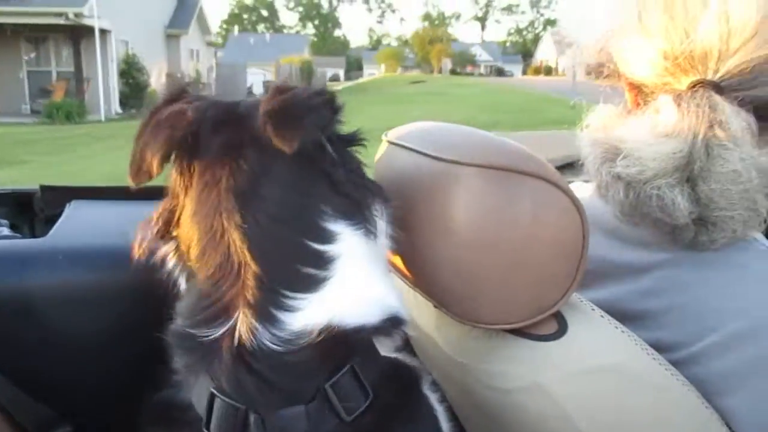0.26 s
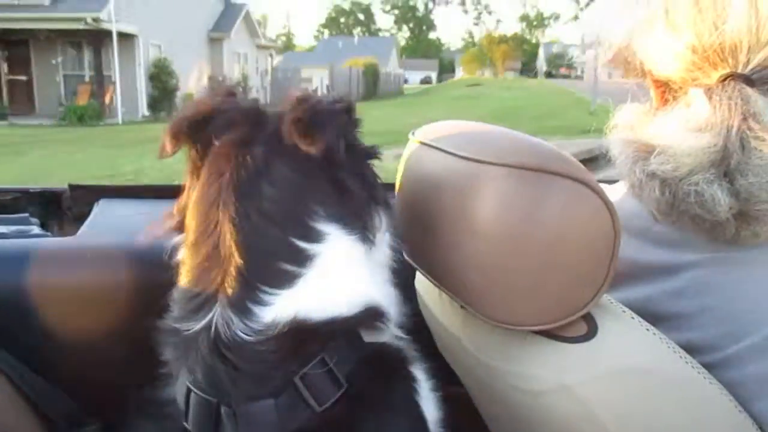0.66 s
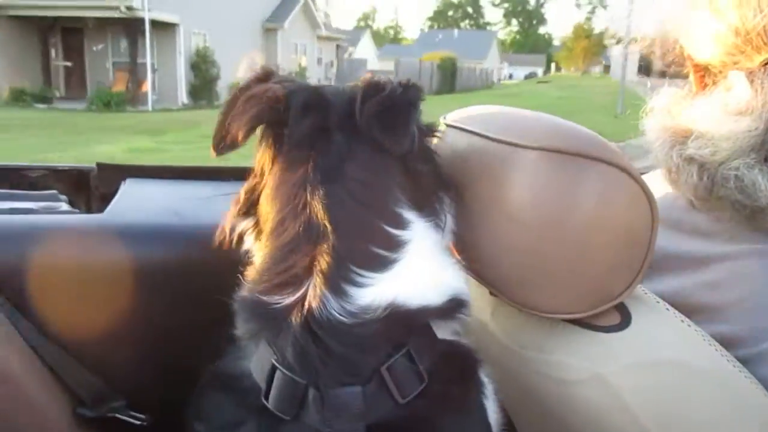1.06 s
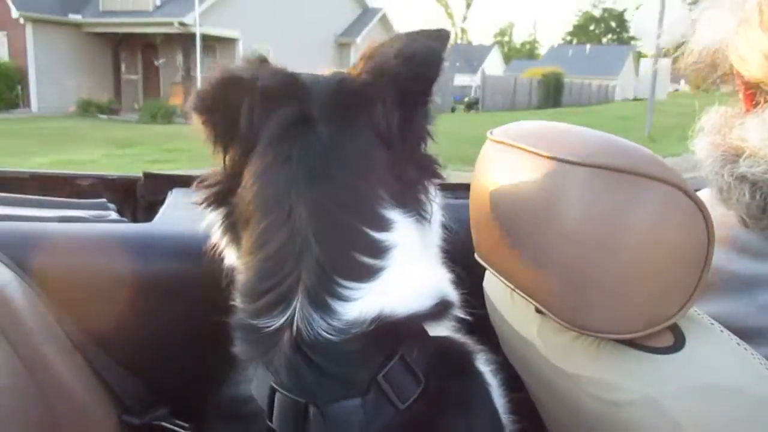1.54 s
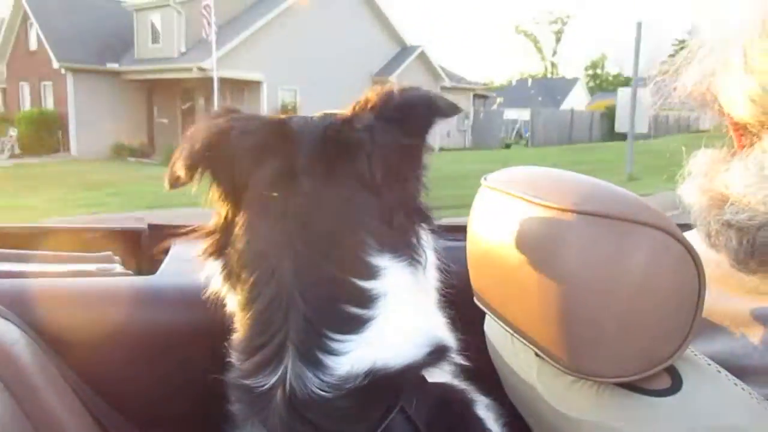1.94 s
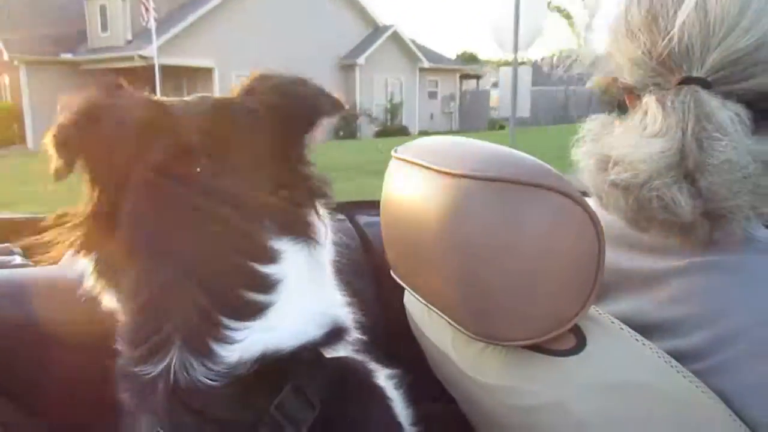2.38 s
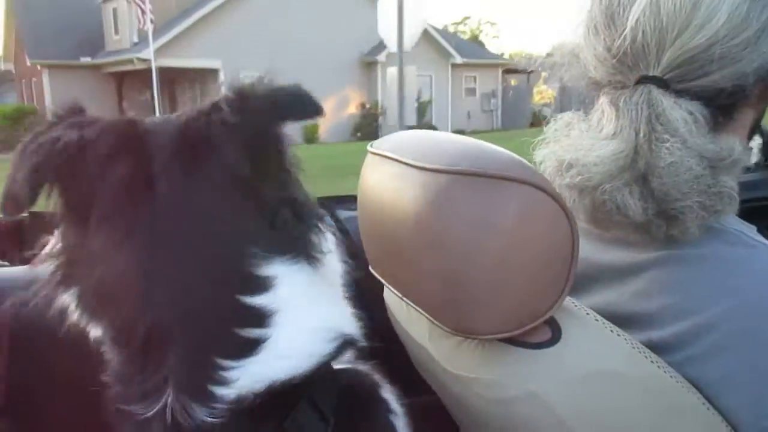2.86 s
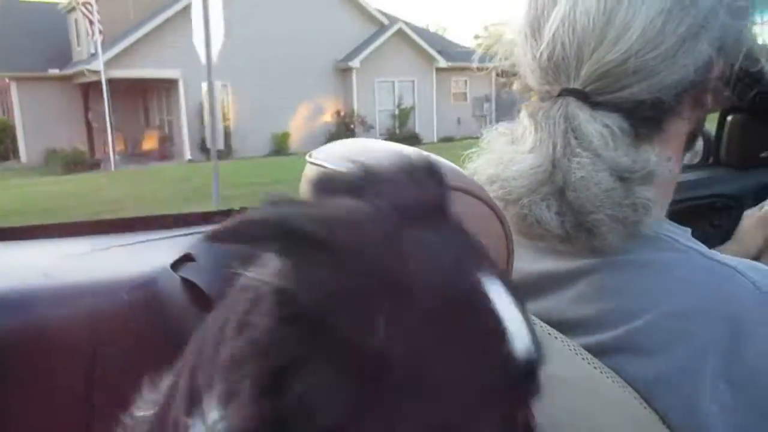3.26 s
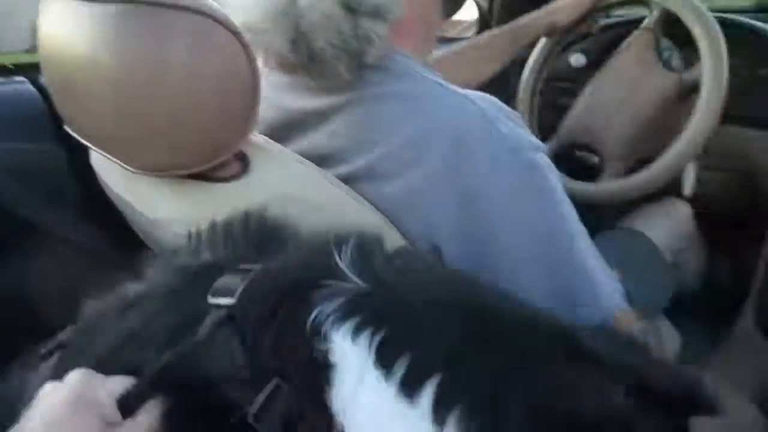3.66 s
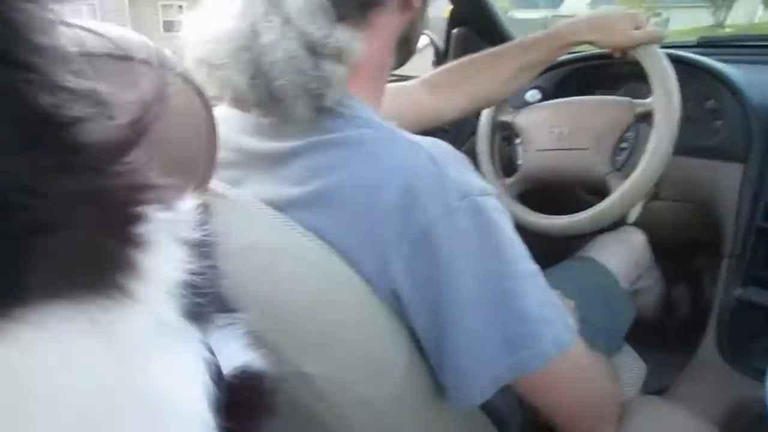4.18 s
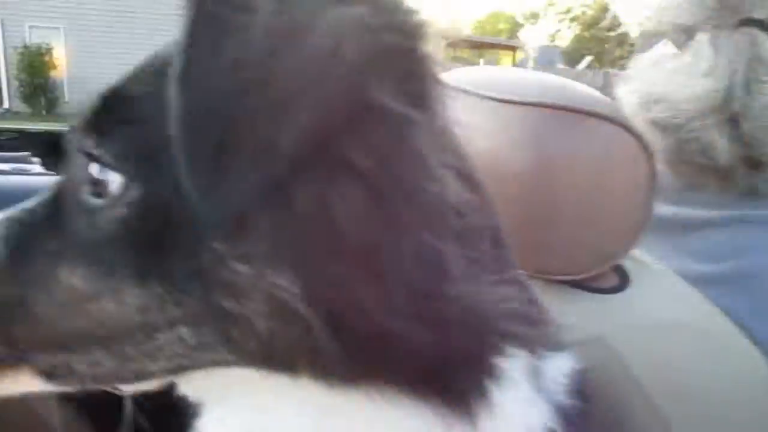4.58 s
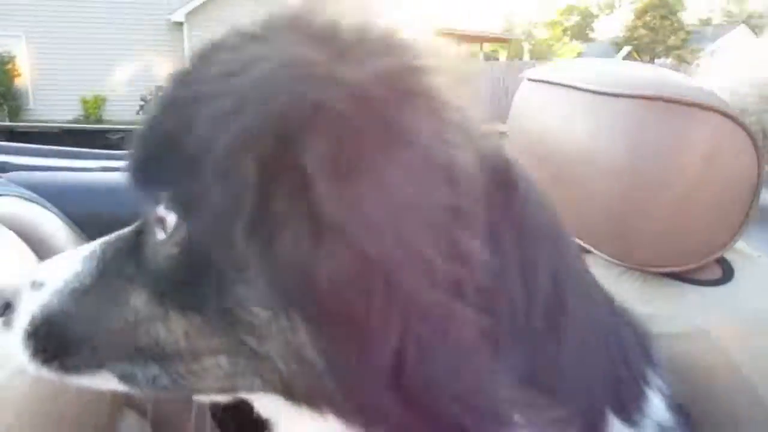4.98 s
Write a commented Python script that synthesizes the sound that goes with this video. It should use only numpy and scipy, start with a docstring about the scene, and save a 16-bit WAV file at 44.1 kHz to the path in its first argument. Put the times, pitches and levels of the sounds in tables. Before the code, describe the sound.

Low engine burble swells into a booming drone in an open-top car while wind pops grow violent and a dog's collar tags clink.

```python
"""Open car pulling away

An open car with an eight-cylinder engine pulls away down a quiet street; the microphone rides in the back.
The exhaust booms and throbs as tones on the engine cycle, with pulsed noise for growl and hiss.
Gusts rumble and flutter as dull noise and pop as short pulses on the microphone. A dog huffs (noise through
resonances), its collar tags clink (ringing modes and ticks) and a far bird chirps (gliding sines)."""
import sys
import numpy as np
from scipy import signal
from scipy.fft import rfft, irfft, next_fast_len
from scipy.io import wavfile

SR = 44100
rng = np.random.default_rng(int(sys.argv[2]) if len(sys.argv) > 2 else 0)


def convert_level_to_amplitude(level_db):
    """Map a level in decibels to its linear amplitude factor."""
    exponent = np.asarray(level_db, float) / 20
    return 10 ** exponent


def materialize(psi):
    """Save the field psi as 16-bit PCM at rate SR to the path in sys.argv[1].

    A 1-D psi becomes a single channel; in a 2-D psi each row is a channel.
    """
    bounded = np.clip(np.atleast_2d(psi).T, -1, 1)
    quanta = np.round(bounded * 32767).astype(np.int16)
    wavfile.write(sys.argv[1], SR, quanta)


N = 230241


def rms_one(x):
    """Scale to rms 1."""
    return x / np.sqrt(np.mean(x ** 2) + 1e-20)


def in_time(rows):
    """Each column of a table, after its time column, as a curve over all samples."""
    s, *columns = np.transpose(rows)
    return [np.interp(np.arange(N) / SR, s, c) for c in columns]


def drift(rate_hz):
    """Random wander of spread 1: noise through two equal low-pass poles at the given rate."""
    hop = 40   # samples between computed points
    r = np.exp(-2 * np.pi * rate_hz * hop / SR)
    settle = 2000
    noise = rng.standard_normal(N // hop + settle + 2)
    slow = signal.lfilter([1], [1, -2 * r, r * r], noise)[settle:]
    return np.interp(np.arange(N) / hop, np.arange(len(slow)), rms_one(slow - slow.mean()))


def coloured(spectrum):
    """Noise with the given spectrum, falling steeply past its last point; rms 1."""
    hz, level_db = np.transpose(spectrum)
    size = next_fast_len(N)
    grid = np.arange(size // 2 + 1) * SR / size + 1
    shape = convert_level_to_amplitude(np.interp(np.log(grid), np.log(hz), level_db, left=-90))
    shape *= np.minimum(1, hz[-1] / grid) ** 4
    return rms_one(irfft(rfft(rng.standard_normal(size)) * shape, size)[:N])


# whistles of a far bird: (start [s], length [s], from [Hz], to [Hz], peak level [dB])
BIRD_CHIRPS = [(1.205, 0.03, 3300, 2940, -61), (1.418, 0.058, 2920, 3160, -63)]


def bird():
    """Short gliding whistles: sines under a smooth rise and fall."""
    out = np.zeros(N)
    for s, length, from_hz, to_hz, level_db in BIRD_CHIRPS:
        size, at = round(length * SR), round(s * SR)
        turns = np.cumsum(np.linspace(from_hz, to_hz, size)) / SR
        out[at:at + size] += convert_level_to_amplitude(level_db) * np.hanning(size) * np.sin(2 * np.pi * turns)
    return out


# resonances of the dog's snout: (centre [Hz], width [Hz], relative level [dB])
SNOUT_RESONANCES = [(2560, 330, 2), (4580, 600, 0), (5940, 480, 1), (7400, 400, -5.5), (11000, 600, -17.5)]
# breaths of the dog: (start of hold [s], length of hold [s], rms level [dB], fade after it [dB/s])
DOG_HUFFS = [(-.03, .23, -57.5, 148.5), (0.388, 0.076, -66.5, 498)]


def huffs():
    """Breath noise through the resonances of the snout: quick rise, hold, fade."""
    attack_db_per_s = 600
    air, out, t = rng.standard_normal(N), np.zeros(N), np.arange(N) / SR
    for k, (hz, width_hz, level_db) in enumerate(SNOUT_RESONANCES):
        r = np.exp(-np.pi * width_hz / SR)
        poles = [1, -2 * r * np.cos(2 * np.pi * hz / SR), r * r]
        out += (-1) ** k * convert_level_to_amplitude(level_db) * signal.lfilter([1 - r * r, 0, r * r - 1], poles, air)
    breath = np.zeros(N)
    for s, length, level_db, fade in DOG_HUFFS:
        rise_db = attack_db_per_s * np.maximum(s - t, 0)
        fade_db = fade * np.maximum(t - s - length, 0)
        breath += convert_level_to_amplitude(level_db - rise_db - fade_db)
    return breath * rms_one(out)


# touches of the collar tags: (time [s], strength [dB], trim of the modes below 8 kHz [dB])
TAG_CLINKS = [(0.303, -50.5, -20), (0.425, -65, -1), (0.4569, -67, 0.5), (2.7472, -53.5, -6),
              (2.7702, -69, -0.5), (3.1546, -47, -23), (3.6018, -32, -6.5), (3.6634, -39, -7.5),
              (4.2271, -43, -12), (4.2846, -48, -25)]
# ringing modes of the tags, one column each: (pitch [Hz])
TAG_MODE_HZ = [6695, 6715, 11968, 14670, 11981, 6115]
# the same modes: (time to fall by 60 dB [s])
TAG_MODE_T60 = [.25, .25, .13, .13, .11, 0.076]
# the same modes: (relative level [dB])
TAG_MODE_DB = [-5, -2.5, -5, -23, -4.5, -6.5]


def tags():
    """Two metal tags touch: a noisy tick and decaying modes, some in close pairs that beat."""
    s, strength_db, lower_db = np.transpose(TAG_CLINKS)
    at, out = np.round(s * SR).astype(int), np.zeros(N)
    luck_db = rng.normal(0, 1.5, (len(at), len(TAG_MODE_HZ)))
    for k, (hz, level_db, t60) in enumerate(zip(TAG_MODE_HZ, TAG_MODE_DB, TAG_MODE_T60)):
        r, w = convert_level_to_amplitude(-60 / (t60 * SR)), 2 * np.pi * hz / SR
        clicks = np.zeros(N) + 1e-18
        trim_db = lower_db * (hz < 8000)
        # modes are struck with alternating signs
        clicks[at] = (-1) ** k * convert_level_to_amplitude(strength_db + level_db - 7 + trim_db + luck_db[:, k])
        out += signal.lfilter([0, np.sin(w)], [1, -2 * r * np.cos(w), r * r], clicks)
    ticks = np.zeros(N)
    ticks[at] = convert_level_to_amplitude(strength_db + 1)
    ticks = signal.lfilter([1], [1, -.985], ticks) * rng.standard_normal(N)
    tick_band = signal.butter(2, [6000, 12500], "band", fs=SR, output="sos")
    return out + signal.sosfilt(tick_band, ticks)


# colour of the wind's rumble: (frequency [Hz], relative density [dB])
RUMBLE_SPECTRUM = [(18, -34), (30, 9), (50, 20), (80, 20), (150, 16), (250, -46)]


def rumble(level_db):
    """Steady airflow presses on the microphone: deep noise with a wandering level."""
    return convert_level_to_amplitude(level_db + 1.3 * drift(6.5)) * coloured(RUMBLE_SPECTRUM)


# colour of the wind's flutter: (frequency [Hz], relative density [dB])
FLUTTER_SPECTRUM = [(60, -16.5), (120, 6), (250, 0.5), (450, -11), (800, -25), (1500, -45), (3000, -72)]
# gusts over the microphone port, also used by scattered_eddies:
# (time of peak [s], flutter level [dB], half length, to 1/e [s])
WIND_GUSTS = [(0.018, -28.5, .02), (0.114, -31, .015), (0.186, -30, 0.024), (0.343, -37, 0.024),
              (0.481, -31.5, 0.026), (0.613, -28, 0.034), (0.792, -33, .015), (0.925, -25.5, .04),
              (1.074, -31, .02), (1.343, -24.5, 0.019), (1.436, -21.5, 0.024), (1.509, -27, 0.0317),
              (1.592, -29.5, 0.024), (1.815, -24, 0.031), (1.937, -20.5, .035), (2.074, -24.5, 0.032),
              (2.53, -27, 0.057), (2.917, -26.5, 0.043), (3.323, -9.5, 0.022), (3.466, -19, .06),
              (3.801, -12, 0.048), (3.954, -15.5, 0.024), (4.034, -20, 0.025), (4.15, -20, 0.024),
              (4.271, -17.5, 0.03), (4.34, -13, .02), (4.431, -19, .02), (4.491, -20, 0.017),
              (4.605, -17, 0.029), (4.684, -17, .03), (4.888, -20, 0.023), (5.054, -21.5, 0.038),
              (5.11, -22.5, 0.034), (5.173, -18.5, 0.029)]


def flutter(steady_db):
    """Dull noise in quick lumps; each gust swells it in a bell shape."""
    t = np.arange(0, N / SR + .001, .001)
    bells = sum(convert_level_to_amplitude(db) * np.exp(-((t - s) / half_s) ** 2) for s, db, half_s in WIND_GUSTS)
    swell = convert_level_to_amplitude(steady_db) + np.interp(np.arange(N) / SR, t, bells)
    lumps_db = 6.65 * np.tanh(0.9 * drift(31))
    return swell * rms_one(coloured(FLUTTER_SPECTRUM) * convert_level_to_amplitude(lumps_db))


def scattered_eddies():
    """Every gust scatters four chance pops about its peak; stronger gusts tend to give brighter ones."""
    s, gust_db, half_s = np.repeat(WIND_GUSTS, 4, axis=0).T
    when, size, pitch = rng.standard_normal((len(s), 3)).T
    pop_s = np.clip(s + half_s * np.tanh(when), 0, (N - 1) / SR)
    peak_db = gust_db + 4.5 - 8 * np.abs(size)
    centre_hz = 500 * convert_level_to_amplitude(pitch + 0.17 * (gust_db + 22))   # 20 dB is a factor of ten in pitch
    return np.transpose([pop_s, peak_db, centre_hz])


def wind_pops(pops):
    """Each eddy is a short pressure pulse of chance shape, doubled by a weaker one some 4 ms away."""
    span = 2048   # samples in a pulse, and the margin at either end
    out = np.zeros(N + 2 * span)
    hz = np.fft.rfftfreq(span, 1 / SR) + 1
    luck = rng.standard_normal((len(pops), span // 2 + 3))
    for (s, peak_db, centre_hz), (turn, spacing, *wander) in zip(pops, luck):
        centre_hz = centre_hz * convert_level_to_amplitude(0.5 * max(peak_db + 3.5, 0))   # the hardest pops crack brighter
        ratio = hz / (0.91 * centre_hz)
        fall = 4.35 * (550 / centre_hz) ** .5   # high pops fall off more gently into the treble
        phase = np.pi * turn + np.log(ratio) + 0.24 * np.cumsum(wander)
        shape = ratio ** 0.57 / (1 + ratio ** fall) / (1 + (ratio / 4.63) ** 3.7)
        pair = 1 + 0.59 * np.exp(-2j * np.pi * hz * (0.003934 + 0.0018 * spacing))
        pulse = np.fft.fftshift(irfft(shape * pair * np.exp(1j * phase))) * np.hanning(span) ** 2
        at = span + round(s * SR) - span // 2
        out[at:at + span] += convert_level_to_amplitude(peak_db) * pulse / np.abs(pulse).max()
    return out[span:span + N]


# pops of the wind on the microphone port, faint to very loud, timed one by one:
# (time [s], peak level [dB], nominal centre [Hz])
TIMED_POPS = [(0.011, -18.5, 465), (0.167, -24.5, 566), (0.191, -20, 446), (0.36, -24.5, 500),
              (0.606, -13.5, 426), (0.786, -24.5, 557), (0.91, -21.5, 470), (1.33, -14.5, 583),
              (1.342, -16.5, 650), (1.37, -13.5, 563), (1.43, -18, 585), (1.471, -8.5, 730),
              (1.51, -9.5, 450), (1.582, -16, 473), (1.596, -18, 450), (1.93, -10, 496), (1.967, -6, 500),
              (2.058, -18, 530), (2.926, -11.5, 454), (3.277, -20.5, 480), (3.293, -12.5, 662),
              (3.312, -1, 543), (3.371, -6.5, 587), (3.404, -16, 694), (3.458, -10, 724),
              (3.485, -10.5, 554), (3.555, -14, 558), (3.757, -19, 605), (3.782, -8, 500),
              (3.834, -13.5, 705), (3.846, -1, 616), (3.894, -3.5, 847), (3.952, -5, 547),
              (4.031, -8.5, 642), (4.113, -8.5, 770), (4.151, -6, 550), (4.281, -2, 473),
              (4.323, -5.5, 708), (4.292, -12.5, 800), (4.337, 1, 690), (4.344, -6, 805), (4.356, -15, 800),
              (4.428, -8.5, 613), (4.439, -10.5, 540), (4.483, -8, 583), (4.497, -12.5, 700),
              (4.527, -11, 500), (4.596, -9.5, 636), (4.667, -17, 650), (4.678, -6, 600),
              (4.686, -12.5, 800), (4.695, -7, 595), (4.882, -6.5, 600), (4.894, -10, 777),
              (4.95, -11, 575), (5.026, -14.5, 780), (5.042, -14, 680), (5.092, -10.5, 835),
              (5.117, -10, 745), (5.146, -14.5, 566), (5.166, -5, 700), (5.179, -5.5, 704),
              (5.192, -7.5, 790), (5.205, -10, 600)]
# steady airflow over the port: (time [s], rumble level [dB], flutter level [dB])
STEADY_AIRFLOW = [(0, -31.5, -42.5), (1.1, -32, -38), (1.55, -26.5, -40.5), (1.75, -31, -35.5),
                  (2.2, -30.5, -39.5), (2.65, -27.5, -42), (3.35, -27.5, -28), (4.25, -25.5, -37),
                  (4.45, -32.5, -35.5), (4.8, -24.5, -30), (5.22, -33, -24.5)]


def wind():
    """Moving air on the microphone: rumble, flutter, and both timed and scattered pops."""
    rumble_db, flutter_db = in_time(STEADY_AIRFLOW)
    pops = wind_pops(TIMED_POPS) + wind_pops(scattered_eddies())
    return rumble(rumble_db) + flutter(flutter_db) + pops


def pipe(x, echo):
    """Sound runs up and down the exhaust pipe: two echoes give evenly spaced resonances; rms 1."""
    lag = round(SR / 169)   # resonances about 169 Hz apart
    return rms_one(x + echo * np.roll(x, lag) + echo ** 2 * np.roll(x, 2 * lag))


# colour of the tyre and intake hiss: (frequency [Hz], relative density [dB])
HISS_SPECTRUM = [(700, -12), (1100, 2.5), (1700, 0), (1880, -3.5), (2150, -0.5), (2880, -6.5), (3570, -5.5),
                 (4200, -7.5), (8400, -19.5), (15000, -39.5)]


def hiss(cycle, level_db):
    """Smooth bright noise, lightly pulsed by the firings."""
    beat_db = 0.7 * np.cos(2 * np.pi * 8 * cycle)
    return convert_level_to_amplitude(level_db) * pipe(coloured(HISS_SPECTRUM) * convert_level_to_amplitude(beat_db + 1.2 * drift(30)), echo=0.12)


# colour of the growl: (frequency [Hz], relative density [dB])
GROWL_SPECTRUM = [(120, -33), (180, -7.5), (275, -11.5), (332, -7.5), (400, -17), (830, -17), (950, -25),
                  (1300, -41), (1700, -65)]


def growl(cycle, level_db):
    """Gas noise in the pipes swells once a cycle and puffs at each firing."""
    beat_db = 2.2 * np.cos(2 * np.pi * cycle) + 2.7 * np.cos(2 * np.pi * 8 * cycle)
    return convert_level_to_amplitude(level_db) * pipe(coloured(GROWL_SPECTRUM) * convert_level_to_amplitude(beat_db + 1.7 * drift(29)), echo=0.28)


# exhaust tones, before boom and load: (multiple of the four-stroke cycle rate,
# level rolling slowly [dB], level pulling [dB], signed weight)
EXHAUST_TONES = [(4, -12, -1.5, 0.9), (6, -4.5, -0.5, 0.19), (8, 5, 2.5, 0.94), (9, -22, -26.5, 1),
                 (10, -19.5, 2, 0.98), (11, -7, -2.5, 0.69), (12, -18.5, -22, 0.54), (14, -9.5, -13, -1.5),
                 (16, 0.5, -9, 0.96), (20, -13, 2.5, 1)]


def exhaust(cycle, firing_hz, pull, load_db):
    """Uneven firing gives wavering tones on the cycle rate; the tailpipe lifts any that cross its boom."""
    boom_hz, boom_width_hz, boom_skirt_db = 119.4, 9.44, -28.5
    out = np.zeros(N)
    for order, slow_db, pulling_db, weight in EXHAUST_TONES:
        off = (order * firing_hz / 8 - boom_hz) / (boom_width_hz / 2)
        boom = np.sqrt(1 / (1 + off ** 2) + convert_level_to_amplitude(2 * boom_skirt_db))
        level_db = slow_db + pull * (pulling_db - slow_db) + 1.33 * drift(2.6)
        out += weight * boom * convert_level_to_amplitude(level_db) * np.cos(2 * np.pi * order * cycle)
    return np.sqrt(2) * convert_level_to_amplitude(load_db) * out


# engine speed: (time [s], firing rate [1/s])
ENGINE_SPEED = [(0.0, 62.0), (0.3, 64.1), (0.72, 61.2), (1.05, 63.3), (1.3, 63.9), (1.65, 70.3),
                (1.98, 74.3), (2.15, 79.7), (2.42, 90.4), (2.62, 94.0), (3.1, 93.8), (3.5, 96.7),
                (3.77, 97.9), (4.2, 105.5), (4.6, 111.8), (4.85, 113.4), (5.22, 113.1)]
# effort of the car: (time [s], exhaust load [dB], tyre and intake hiss [dB])
CAR_LEVELS = [(0, -28, -56), (0.25, -26.5, -63), (0.5, -23, -63.5), (0.8, -20, -63), (1.25, -17, -59.5),
              (1.5, -24.5, -58), (1.9, -16, -55), (2.15, -13, -51.5), (2.4, -14.5, -47.5), (2.6, -9, -45.5),
              (2.9, -13.5, -50), (3.35, -12, -50.5), (3.7, -14.5, -53), (4, -9, -47.5), (4.25, -9.5, -51.5),
              (4.4, -14.5, -55), (4.65, -11, -51), (4.9, -9, -51), (5.22, -13, -49)]


def car():
    """One engine cycle of eight firings drives exhaust, growl and hiss; growl gains on hiss with speed."""
    slow_hz, pulling_hz = 71.4, 80   # firing rates between which the tone pattern changes
    firing_hz = in_time(ENGINE_SPEED)[0]
    cycle = -0.3 + np.cumsum(firing_hz / 8) / SR   # in turns
    pull = np.clip((firing_hz - slow_hz) / (pulling_hz - slow_hz), 0, 1)
    load_db, hiss_db = in_time(CAR_LEVELS)
    growl_db = hiss_db + 12 + 0.2225 * (firing_hz - slow_hz)
    return exhaust(cycle, firing_hz, pull, load_db) + growl(cycle, growl_db) + hiss(cycle, hiss_db)


def scene():
    """All sources meet in the open air, without a room."""
    return (bird() + huffs() + tags() + wind() + car())[None]


def roll_off(x):
    """The treble ends steeply here."""
    return signal.sosfilt(signal.butter(12, 15820, fs=SR, output="sos"), x)


def record(dry):
    """Faint microphone hiss; peaks over the limit pull the gain down, it creeps back; the rest clips."""
    limit_db, recovery_db_per_s, mic_noise_db = -3.5, 11.5, -84.5
    over_db = np.maximum(20 * np.log10(np.abs(dry[0]) + 1e-9) - limit_db, 0)
    ramp = recovery_db_per_s * np.arange(N) / SR
    held_db = np.maximum.accumulate(over_db + ramp) - ramp
    cut_db = signal.lfilter([.004], [1, .004 - 1], held_db)   # the gain takes some 6 ms to follow
    noisy = dry + convert_level_to_amplitude(mic_noise_db) * rng.standard_normal(N)
    mix = np.clip(noisy * convert_level_to_amplitude(-cut_db), -1, 1)
    return roll_off(mix)


dry = scene()
out = record(dry)
materialize(out)
```